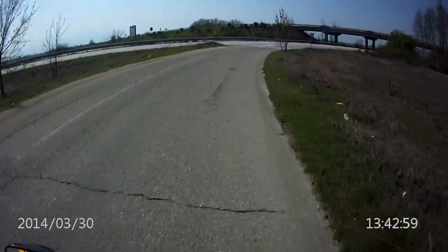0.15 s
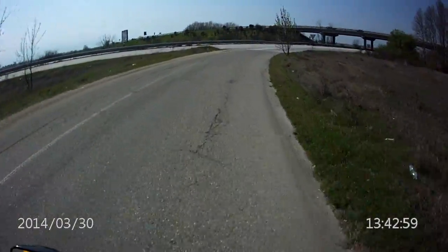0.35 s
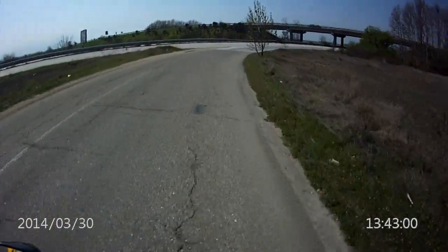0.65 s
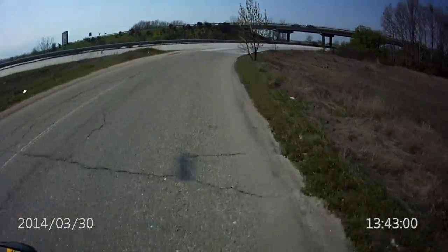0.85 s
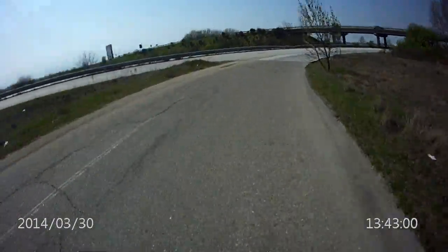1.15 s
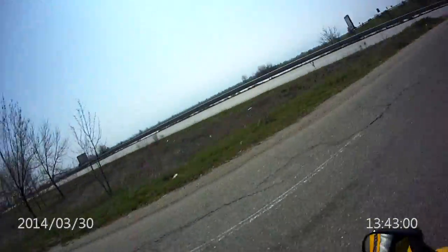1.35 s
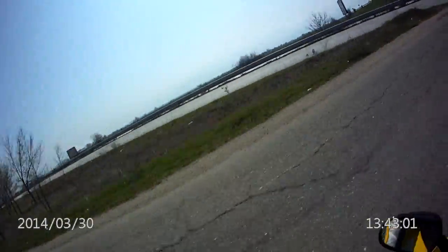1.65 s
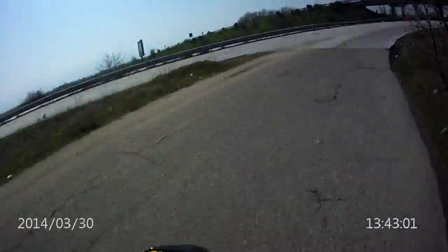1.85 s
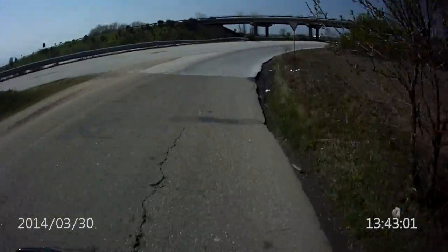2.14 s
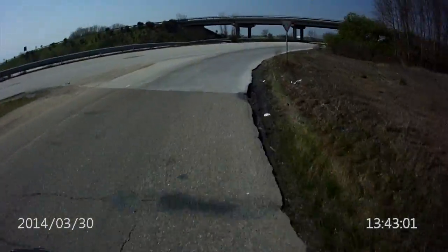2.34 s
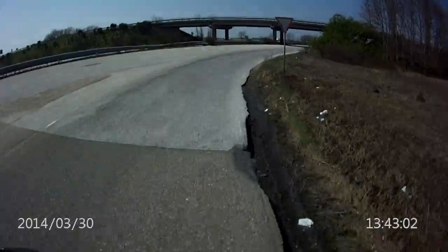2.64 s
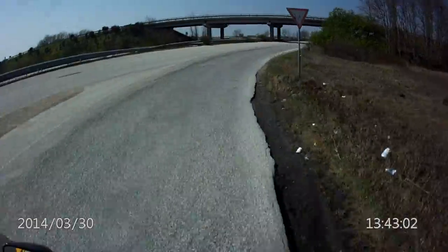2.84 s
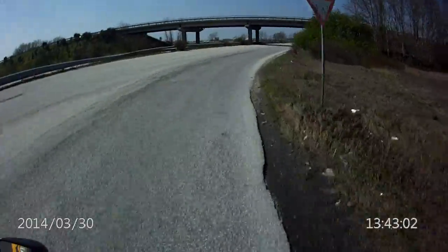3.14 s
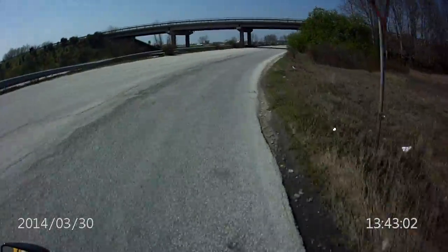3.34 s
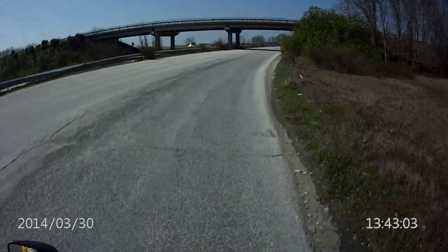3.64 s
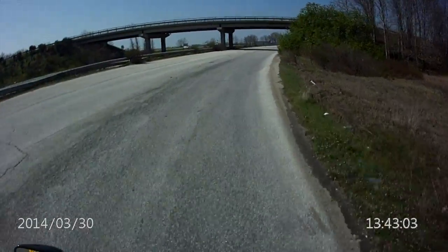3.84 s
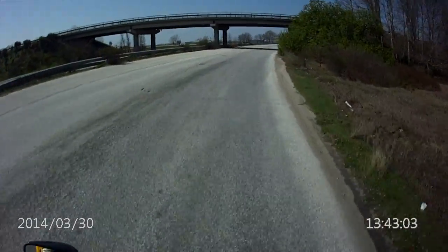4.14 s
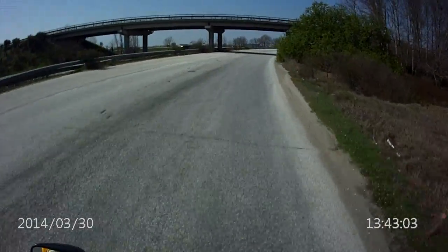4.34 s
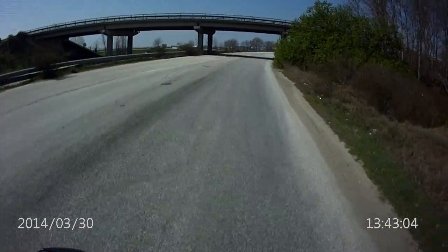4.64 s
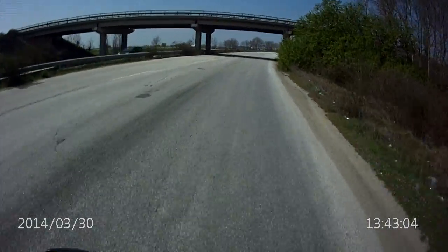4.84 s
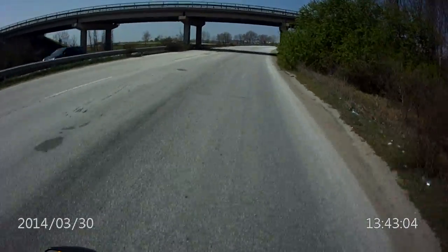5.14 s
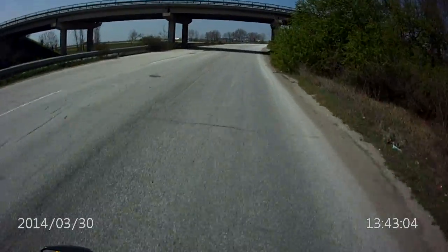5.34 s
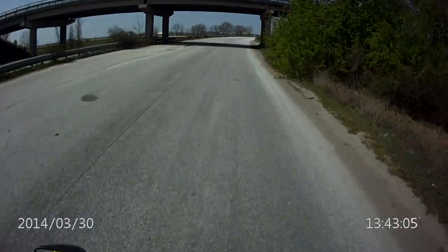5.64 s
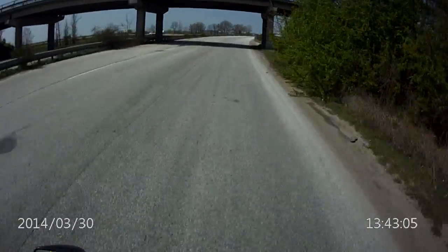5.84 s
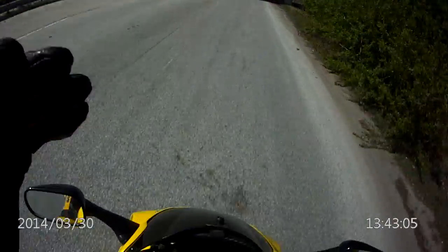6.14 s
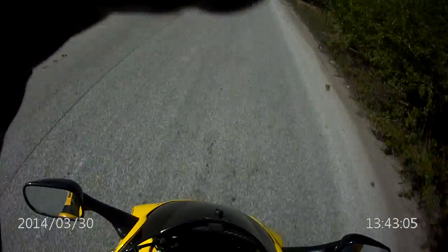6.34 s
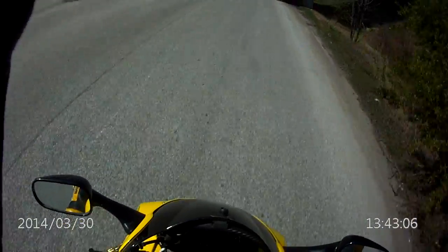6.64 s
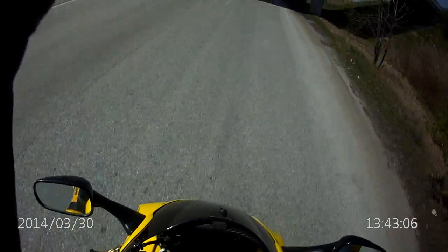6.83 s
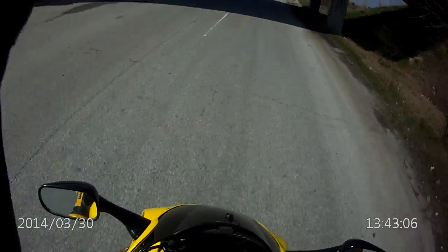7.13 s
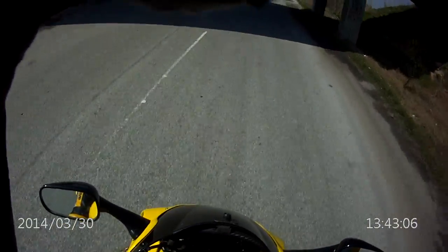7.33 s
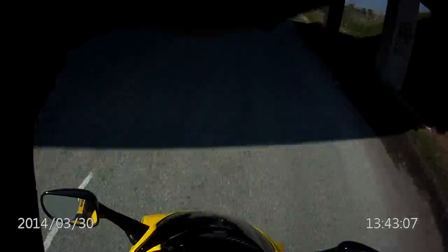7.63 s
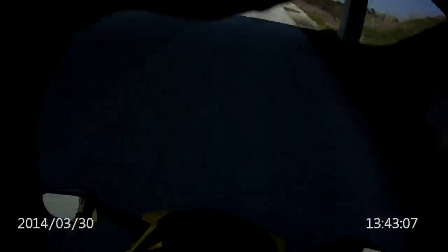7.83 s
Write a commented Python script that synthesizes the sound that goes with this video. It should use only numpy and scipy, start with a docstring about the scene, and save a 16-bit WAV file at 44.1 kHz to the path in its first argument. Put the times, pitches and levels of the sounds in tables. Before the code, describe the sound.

Wind rushes over an enclosed helmet camera above a faint engine drone, until a hand grabs the housing with clattering knocks, scrapes and brief dropouts.

```python
"""Wind buffets and hisses on a helmet camera shut in a plastic housing, on a motorcycle that speeds up.
It is filtered noise that follows the airflow and rings the housing; it thins while the head is turned.
Under it lie tyre roar (noise) and engine hum (harmonics of the firing rate), with short jolts of chatter.
Then a hand grips the housing and tilts the mount: knocks (dying tones), rubbing and rustling (noise),
and one hard crack. The microphone overloads softly, and the sound cuts out for moments."""
import sys
import numpy as np
from scipy import signal
from scipy.fft import rfft, irfft
from scipy.io import wavfile
from scipy.ndimage import uniform_filter1d

SR = 44100
rng = np.random.default_rng(int(sys.argv[2]) if len(sys.argv) > 2 else 0)


def bounce(signal):
    """Save signal as a 16-bit WAV file at the path given by the first command-line argument."""
    frames = np.transpose(np.atleast_2d(signal))
    limited = np.clip(frames, -1, 1)
    pcm = np.round(limited * 32767).astype(np.int16)
    wavfile.write(sys.argv[1], SR, pcm)


N = 351915
TIME = np.arange(N) / SR  # seconds
HZ = np.fft.rfftfreq(N, 1 / SR)

# Strength of the airflow on the housing. Each row: time in seconds, strength in dB.
AIRFLOW = [(0, -38.5), (.08, -44.5), (.5, -45), (.68, -43.5), (1.1, -44), (1.22, -43.5), (1.45, -43),
           (1.8, -42), (1.97, -44.5), (2.14, -42.5), (2.35, -46.5), (2.6, -46.5), (3.33, -44),
           (3.42, -39.5), (3.65, -39.5), (3.85, -40.5), (4.24, -40), (4.32, -37), (5.75, -36), (6.12, -37),
           (6.3, -34.5), (6.6, -37), (7.0, -39), (7.98, -41)]
CRUISE_DB = -40  # airflow strength at cruising speed
# The rider looks aside. Start and end in seconds.
TURN = (1.267, 2.04)
# The part of that turn in which wind catches the housing's edge. Start and end in seconds.
EDGE_ON = (1.23, 1.875)
# The hand tips the camera down towards the road. Start and end in seconds.
TILT = (6.67, 6.78)
GRIP_S = 6.31  # the hand takes hold of the housing
CLOSE_S = 0.46  # time it takes to close round it

# Colour of turbulence muffled by the housing wall. Each row: frequency in Hz, relative level in dB per Hz.
MUFFLE = [(25, -29), (60, -19), (120, -8.5), (185, -8.5), (280, -2), (550, -0.5), (1450, 2.5), (2300, -2.5),
          (2800, -11), (4500, -7.5), (5200, -18), (6200, -20.5), (6700, -35), (7800, -40.5), (8800, -68)]
# Resonances of the housing. Each row: frequency in Hz, width in Hz, lift in dB when free, lift in dB when held.
HOUSING = [(360, 39, 2, -2), (1247, 226, 6, 3), (1696, 302, 9.5, 11), (1884, 244, 8.5, 6),
           (3088, 110, 6, 6), (3786, 640, 6.5, 4.5), (5980, 260, 5, 0), (7280, 550, 10, 17.5)]
# Colour of the faint high fizz: steady microphone self-noise, airy hiss and glove rustle.
# Each row: frequency in Hz, relative level in dB per Hz.
FIZZ = [(7000, -27), (9000, -18), (10500, -7), (11700, 1), (12700, -4), (13500, 2), (14800, -3),
        (15500, -23)]
# Colour of the sizzle of wind on an edge. Each row: frequency in Hz, relative level in dB per Hz.
SIZZLE = [(2500, -14), (3800, 13), (4500, 9), (5100, -3), (6200, -5), (7500, -5.5), (8200, -40),
          (12000, -18), (15000, -30)]

# Knocks and rattles. Each row: start in seconds, mount clack in dB, shell ring in dB, soft thud in dB,
# clack pitch in Hz, brightness of the ring in dB per octave.
KNOCKS = [(6.3283, -12, -32, -26, 910, -4), (6.3325, -13, -9.5, -32, 885, 7),
          (6.3357, -21, -11, -43, 1110, 5), (6.3439, -23, -25, -19, 750, 0),
          (6.348, -13.5, -18, -11, 550, -6), (6.352, -27, -25, -26, 506, 9),
          (6.416, -42, -53, -21.5, 740, 0), (6.4225, -34, -34, -19.5, 730, -2),
          (6.604, -29, -34, -23, 650, 0), (6.6075, -40, -21, -37, 740, 8),
          (6.6177, -15.5, -19, -18, 615, -12), (6.6205, -24, -16.5, -32, 700, -17),
          (6.6346, -31, -32, -24, 740, 0), (6.6711, -26, -36, -22.5, 690, 0),
          (6.6755, -38, -45, -34, 300, 0), (6.7237, -36, -29, -29, 740, 0), (6.8664, -33, -37, -25, 740, 0),
          (6.878, -37, -44, -30, 400, 0), (7.0258, -20, -21, -16.5, 560, 0),
          (7.0391, -15, -37, -19, 285, 0), (7.0463, -28, -15.5, -37, 1300, -6),
          (7.1938, -4, -14.5, -11, 703, 3), (7.3112, -19.5, -44, -20.5, 624, 0),
          (7.4052, -23, -34, -37, 765, -3), (7.4108, -18, -22, -36, 800, 5), (7.433, -26, -36, -17, 436, 0),
          (7.4379, -29, -28, -20.5, 470, -2), (7.458, -35, -46, -19.5, 740, 0),
          (7.5114, -25.5, -22.5, -18, 740, -3), (7.599, -43, -36, -29, 740, 2),
          (7.707, -36, -43, -46, 400, 0), (7.7166, -29, -36, -39, 427, 0), (7.966, -36, -49, -36, 350, 0)]
# Modes (ringing tones) of the mount, before retuning to each clack's pitch.
# Each row: frequency in Hz, relative level in dB, time to die by 60 dB in seconds.
MOUNT = [(731, 3, 0.0096), (1010, -2, 0.0099), (1405, -16.5, 0.027), (2390, -23, .011),
         (3040, -21.5, 0.016), (4100, -20, 0.013)]
# Modes of the housing's shell, before each knock's brightness.
# Each row: frequency in Hz, relative level in dB, time to die by 60 dB in seconds.
SHELL = [(1270, 9.5, 0.017), (1666, 6.5, 0.023), (1888, 5, 0.065), (3900, -20, .0081), (4500, -15.5, 0.02),
         (5950, -36, .008)]
SNAP_S = 7.1949  # the mount's ratchet cracks
# Colour of that crack. Each row: frequency in Hz, relative level in dB per Hz.
CRACK = [(1000, -23), (2000, -11), (2700, 1), (3200, 9.5), (3650, 2.5), (4150, 6.5), (4650, -4),
         (5200, -15), (6100, -20), (7300, -23), (10000, -18), (15000, -24)]
# Glove and joint rubbing, levels at mid-stroke before the judder.
# Each row: start in seconds, end in seconds, scrape in dB, squeaky fizz in dB, rumble in dB.
RUBS = [(6.326, 6.348, -22.5, -35, -34), (6.33, 6.428, -41, -55, -45), (6.45, 6.534, -35.5, -53, -53),
        (6.596, 6.698, -42.5, -47, -41), (6.854, 6.897, -42, -66, -37), (7.008, 7.072, -34.5, -61, -35.5),
        (7.298, 7.348, -36.5, -64, -39), (7.391, 7.448, -35.5, -53, -43), (7.426, 7.492, -41, -54.5, -31.5),
        (7.51, 7.529, -39.5, -56, -35.5), (7.63, 7.757, -49.5, -57, -48), (7.926, 7.995, -55, -67, -40.5)]
# Colours of rubbing. Each row: frequency in Hz, relative level in dB per Hz.
SCRAPE = [(100, -16), (350, -0.5), (800, 6), (1400, -8.5), (2200, -4.5), (3000, -8), (4500, -29),
          (8000, -48)]
SQUEAK = [(1500, -18), (3500, -1), (6000, -2.5), (7600, -15), (9000, -47), (14500, -4.5), (16000, -23)]
RUMBLE = [(20, -13), (70, 10), (200, 2), (400, 1.5), (800, -17), (2000, -49)]

# Road jolts and sharp gusts that shiver the housing. Each row: time in seconds, level in dB.
BUMPS = [(.025, -39), (.115, -39), (.575, -38.5), (.702, -35), (1.245, -36), (1.62, -38), (1.657, -31.5),
         (2.021, -35), (2.191, -31), (2.456, -34), (3.05, -37), (3.63, -34), (4.492, -31), (5.708, -30),
         (6.261, -30), (6.305, -29), (6.321, -21.5)]
COARSE_S = 2.8  # the tyres roll on to coarser asphalt
# Engine speed. Each row: time in seconds, firing rate in Hz.
FIRING = [(0, 83.5), (.5, 82), (.95, 80.4), (1.45, 82.5), (1.7, 81.6), (2.2, 78.8), (2.7, 79.3),
          (3.15, 78.3), (3.5, 80), (4, 82.2), (4.5, 85.3), (5, 89.8), (6, 98.2), (6.4, 100.7), (7, 102.9),
          (7.9, 98.4)]
# Throttle opening. Each row: time in seconds, level in dB relative to wide open.
THROTTLE = [(0, -5.5), (.8, -8), (1.15, -4), (1.55, -2.5), (1.9, -8.5), (2.85, -10), (3.15, -5.5),
            (4.0, -4), (4.4, -1.8), (4.9, -.3), (6.1, 0), (7, -2.5), (7.98, -7)]
# Exhaust note. Each row: multiple of the firing rate, level in dB at open throttle and full revs,
# share of the throttle change it follows, dB lost per Hz below full revs (a negative loss is a gain).
ORDERS = [(1, -63, .65, 0.25), (2, -76.5, 0.53, -1), (3, -55, 1.1, 1.7), (4, -53.5, 1.2, 0.9),
          (5, -63, 1, -0.5), (6, -65, 2, 2)]
FULL_REVS_HZ = 88.7  # from this firing rate up, the harmonics lose nothing

# Moments when the sound cuts out. Each row: start in seconds, end in seconds.
CUTS = [(6.34, 6.3434), (6.3695, 6.415), (6.4232, 6.4702), (6.864, 6.8662), (7.043, 7.0455),
        (7.3131, 7.3325), (7.3505, 7.396), (7.4588, 7.5114), (7.5207, 7.5902)]
EDGE_HZ = 15700  # upper band limit


def wind():
    """Eddies buffet, rush and hiss on the housing, all shaken by the same gusts.

    Higher bands grow faster with the airflow; turning the head trades buffeting for hiss."""
    air_db, turned = airflow(), aside()
    gust, flutter = wander(5, 24), wander(32, 140)
    buffet_db = -43.5 + 0.4 * air_db + 0.73 * surge() - 6.8 * turned - 2.4 * tilted()
    buffet_band = above(440, order=3) * below(1288)
    buffet = through_wall(buffet_band) * amp(buffet_db + 0.8 * gust)
    rush_db = -40.5 + air_db + 1.1 * gust + 0.51 * flutter
    rush = through_wall(above(1480) * below(2730)) * amp(rush_db)
    shake_db = 0.7 * gust + 0.63 * flutter
    hiss_db = -53.0 + 1.3 * air_db + 1.3 * turned + shake_db
    hiss = through_wall(above(2294) * below(4750)) * amp(hiss_db)
    sheen_db = -63.5 + 1.57 * air_db + 2.7 * turned + shake_db
    sheen = through_wall(above(4940)) * amp(sheen_db)
    # steady microphone self-noise, plus an airy hiss that follows the airflow
    fizz = shaped(colour(FIZZ)) * (amp(-86) + amp(-96.0 + 1.4 * air_db))
    return buffet + rush + hiss + sheen + fizz


def graze(first_db=-59, last_db=-54, ramp_s=.08, gusty_db=1.8):
    """Wind across an edge makes a bright, fluttering hiss: it starts quickly, swells unevenly and stops."""
    level_db = np.interp(TIME, EDGE_ON, [first_db, last_db]) + gusty_db * wander(5, 50)
    return during(EDGE_ON, ramp_s) * amp(level_db) * shaped(colour(SIZZLE))


def hoot(hz=730, width_hz=78, level_db=-49.5, stall_db=-3.0, stalled_db=-9, turned_db=-11):
    """Air across a gap in the mount sounds a breathy cavity; fast air or a turned head weakens it."""
    stalled = .5 + .5 * np.tanh(airflow() - stall_db)  # 0 in slow air, 1 in fast air
    db = level_db + stalled_db * stalled + turned_db * aside()
    resonance = 1 / (1 + ((HZ - hz) / width_hz * 2) ** 2 / 2)
    return amp(db) * shaped(resonance * below(750))


def airflow():
    """Airflow in dB relative to that at cruising speed."""
    return curves(AIRFLOW)[0] - CRUISE_DB


def surge(span_s=1.1):
    """How far a passing gust lifts the airflow above its running mean, in dB."""
    return airflow() - uniform_filter1d(airflow(), size=round(span_s * SR))


def aside(ramp_s=0.06):
    """How far the head is turned, 0 to 1."""
    return during(TURN, ramp_s)


def tilted():
    """How far the camera is tipped down, 0 to 1."""
    return np.interp(TIME, TILT, [0, 1])


def through_wall(band):
    """A band of turbulence inside the housing, whose resonances change as the hand closes round it."""
    drive = rng.standard_normal(N)
    free = shaped(colour(MUFFLE) * housing(False) * band, drive)
    held = shaped(colour(MUFFLE) * housing(True) * band, drive)
    closed = np.clip((TIME - GRIP_S) / CLOSE_S, 0, 1)
    return free + closed * (held - free)


def housing(held=False):
    """Gain of the housing's resonances, free or in the hand."""
    lift_db = 0
    for hz, width, free_db, held_db in HOUSING:
        peak_db = held_db if held else free_db
        lift_db = lift_db + peak_db * 2 ** -((2 * (HZ - hz) / width) ** 2)
    return amp(lift_db)


def knocks(thud_s=0.001, thud_rise_s=0.00031, contact_hz=6000):
    """Each blow clacks the mount, rings the shell and pushes a pressure pulse into the housing."""
    t = np.arange(SR // 10) / SR
    thud = (1 - t / (2 * thud_s)) * np.exp(-t / thud_s) * (1 - np.exp(-t / thud_rise_s))
    thud = thud / thud.max()
    out = np.zeros(N)
    for s, clack_db, ring_db, thud_db, clack_hz, bright_db in KNOCKS:
        # a looser joint rings lower and longer
        clack = struck(MOUNT, t * clack_hz / MOUNT[0][0])
        # a harder touch favours the upper modes
        shell = [(hz, db + bright_db * np.log2(hz), t60) for hz, db, t60 in SHELL]
        ring = struck(shell, t)
        add(out, s, amp(clack_db) * clack + amp(ring_db) * ring - amp(thud_db) * thud)
    # plastic on plastic is too soft for the top octave
    return irfft(rfft(out) * below(contact_hz, order=4), N)


def struck(modes, t):
    """Dying modes, peak 1; neighbours swing in opposite directions, so the ring builds up."""
    ring = 0
    for k, (hz, db, t60) in enumerate(modes):
        ring = ring + (-1) ** k * amp(db - 60 * t / t60) * np.sin(2 * np.pi * hz * t)
    return ring / abs(ring).max()


def snap(peak_db=-7.5, rebound_s=.0026, rebound_db=-17):
    """The joint snaps over a ratchet tooth: one very short, hard crack and a small rebound."""
    blow = np.zeros(N)
    add(blow, SNAP_S, np.ones(1))
    add(blow, SNAP_S + rebound_s, amp(rebound_db) * np.ones(1))
    # folding the cepstrum forward keeps the colour, with nothing ahead of the blow
    cepstrum = irfft(np.log(colour(CRACK)), N)
    sudden = np.exp(rfft(cepstrum * 2 * (np.arange(N) < N // 2)))
    crack = shaped(sudden, blow)
    return amp(peak_db) * crack / abs(crack).max()


def rubbing(slips_per_s=2600, spread_db=2.5, judder_db=2.5):
    """Tiny uneven slips scrape and squeak, the hand's push rumbles; the glove sticks and slips in judders."""
    happens = rng.random(N) < slips_per_s / SR
    boost_db = spread_db * np.minimum(rng.exponential(1, N), 2)
    slips = rng.standard_normal(N) * happens * amp(boost_db)
    scrape = shaped(colour(SCRAPE) * housing(), slips)
    squeak = shaped(colour(SQUEAK) * housing(), slips)
    rumble = shaped(colour(RUMBLE))
    out = np.zeros(N)
    for start, end, scrape_db, squeak_db, rumble_db in RUBS:
        progress = np.clip((TIME - start) / max(end - start, 1e-3), 0, 1)
        stroke = np.sin(np.pi * progress)
        out += stroke * (amp(scrape_db) * scrape + amp(squeak_db) * squeak + amp(rumble_db) * rumble)
    return out * amp(judder_db * wander(25, 110))


def rustle(grab_db=-64, settled_db=-77, settle_s=0.89, press_db=13):
    """The glove's fine fizz on the case over the faint rumble of its grip; both ease as the hand settles."""
    held_s = TIME - GRIP_S
    level_db = np.interp(held_s, [0, settle_s], [grab_db, settled_db]) + 1.8 * wander(8, 59)
    grip = (held_s > 0) * amp(level_db)
    return grip * (shaped(colour(FIZZ)) + amp(press_db) * shaped(colour(RUMBLE)))


def engine(waver_db=.56, unsteady=.0038):
    """Harmonics of the firing rate, each following throttle and revs in its own way, rougher under load."""
    rate, throttle_db = curves(FIRING)[0], curves(THROTTLE)[0]
    turns = np.cumsum(rate * (1 + unsteady * wander(3, 18))) / SR  # firing cycles so far
    short_hz = np.maximum(FULL_REVS_HZ - rate, 0)
    out = np.zeros(N)
    for k, (_, db, share, lost_db) in enumerate(ORDERS, 1):
        rough_db = waver_db * k * amp(throttle_db) * wander(4, 40)
        level_db = db + share * throttle_db - lost_db * short_hz + rough_db
        out += amp(level_db) * np.sin(2 * np.pi * (k * turns + rng.random()))
    return np.sqrt(2) * out  # makes the levels rms


def bumps(rise_s=0.0028, fall_s=0.0051):
    """Each jolt makes the housing chatter briefly around its main resonances."""
    band = above(1000, order=3) * below(2600, order=2)
    chatter = shaped(housing() ** 2 * colour(MUFFLE) * band)
    swell = np.zeros(N)
    for s, db in BUMPS:
        distance = np.maximum((s - TIME) / rise_s, (TIME - s) / fall_s)
        swell += amp(db) * np.exp(-distance ** 2)
    return swell * chatter


def road(level_db=-56.0, db_per_hz=0.1156, coarse_db=2, air_share=0.097, facing_db=4.0, turned_db=-2.0):
    """Low tyre roar grows with engine speed, airflow, coarse asphalt and tilt to the road."""
    rate = curves(FIRING)[0]
    coarse = np.clip((TIME - COARSE_S) / .2, 0, 1)
    db = level_db + db_per_hz * (rate - rate.min()) + coarse_db * coarse
    db = db + air_share * airflow() + facing_db * tilted() + turned_db * aside()
    return amp(db + 1.0 * wander(2, 13)) * shaped(colour(MUFFLE) * housing() * below(510, order=6))


def amp(db):
    """Decibels to gain."""
    return 10 ** (np.asarray(db) / 20)


def unit(x):
    """Scales to rms (average strength) 1."""
    return x / np.sqrt(np.mean(x ** 2) + 1e-20)


def curves(rows):
    """Each column of a time table, sample by sample."""
    s, *columns = np.transpose(rows)
    return [np.interp(TIME, s, c) for c in columns]


def colour(points):
    """Gain at every frequency from rows of Hz and dB."""
    f, db = np.transpose(points)
    return amp(np.interp(np.log(HZ + 1), np.log(f), db))


def shaped(gain, drive=None):
    """White noise, or a given drive, through a filter; rms 1."""
    drive = rng.standard_normal(N) if drive is None else drive
    return unit(irfft(rfft(drive) * gain, N))


def below(hz, order=6):
    """Low-pass gain."""
    return 1 / np.sqrt(1 + (HZ / hz) ** (2 * order))


def above(hz, order=6):
    """High-pass gain that complements the low-pass in power."""
    return np.sqrt(1 - below(hz, order=order) ** 2)


def wander(slow_hz, fast_hz):
    """Random drift between two rates; rms 1."""
    return shaped(above(slow_hz, order=2) * below(fast_hz, order=2))


def during(span, ramp_s):
    """Rises from 0 to 1 around the start of a span and falls back around its end."""
    start, end = span
    return np.clip(.5 + np.minimum(TIME - start, end - TIME) / ramp_s, 0, 1)


def add(mix, s, sound):
    """Mixes a sound in at a time in seconds."""
    part = mix[round(s * SR):][:len(sound)]
    part += sound[:len(part)]


def scene():
    """Everything that the one microphone gives, its self-noise included."""
    riding = wind() + graze() + hoot() + engine() + bumps() + road()
    handling = knocks() + snap() + rubbing() + rustle()
    return (riding + handling)[None]


def record(dry, drop_db=-31, fade_db_per_s=1000, low_cut_hz=35, ceiling=.85, drain_s=.0005):
    """Bass roll-off, soft overload, cut-outs at the listed times, then the upper band limit."""
    low_cut = signal.butter(2, low_cut_hz, "high", fs=SR, output="sos")
    pressure = signal.sosfilt(low_cut, dry[0])
    heard = ceiling * np.tanh(pressure / ceiling)
    for start, end in CUTS:
        dead = (TIME >= start) & (TIME < end)
        t, lost = TIME[dead] - start, heard[dead]
        # the last value drains away with a small pop as the sound drops fast to silence; then it snaps back
        heard[dead] = lost[0] * np.exp(-t / drain_s) + amp(drop_db - fade_db_per_s * t) * lost
    band_limit = signal.firwin(255, EDGE_HZ, window=("kaiser", 9), fs=SR)
    return signal.oaconvolve(heard, band_limit, "same")[None]


dry = scene()
out = record(dry)
bounce(out)
```